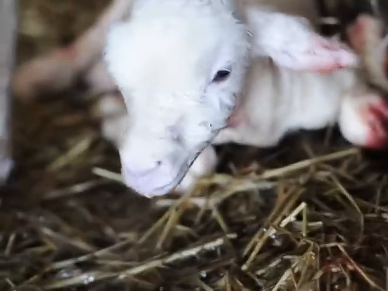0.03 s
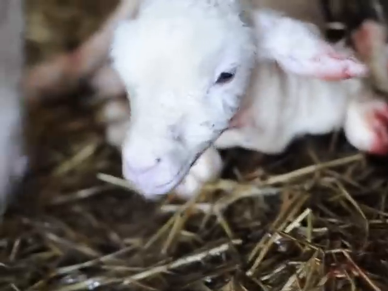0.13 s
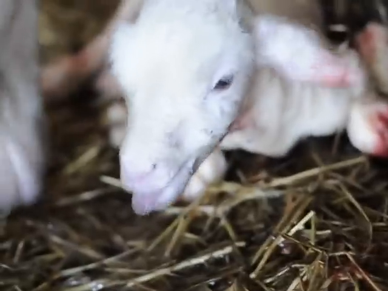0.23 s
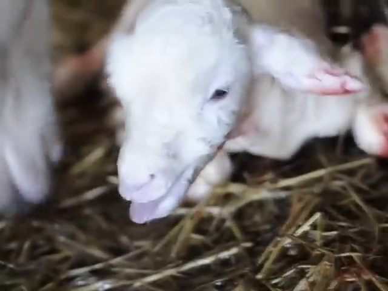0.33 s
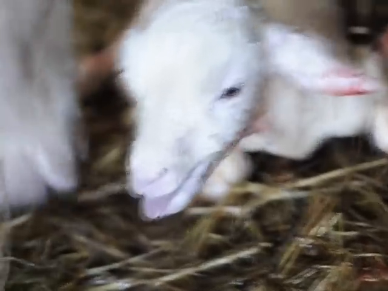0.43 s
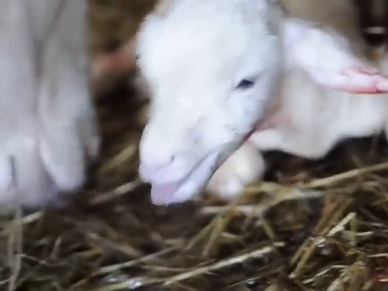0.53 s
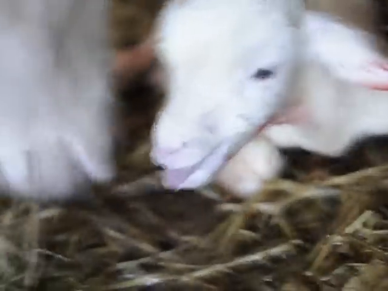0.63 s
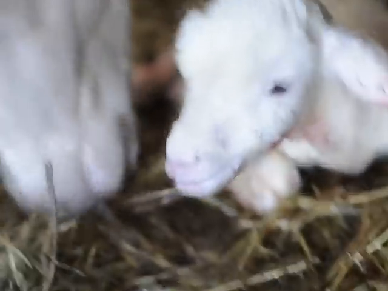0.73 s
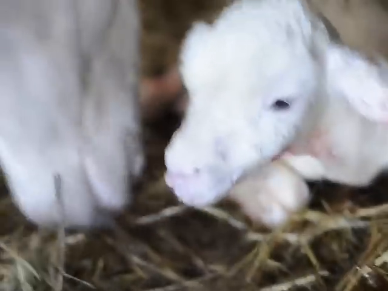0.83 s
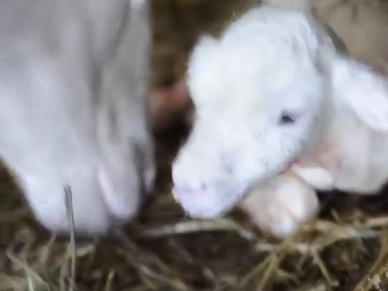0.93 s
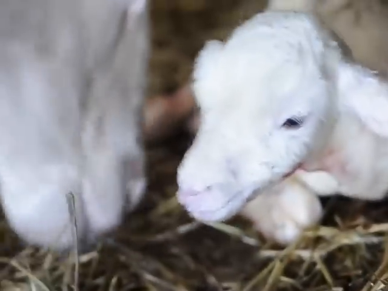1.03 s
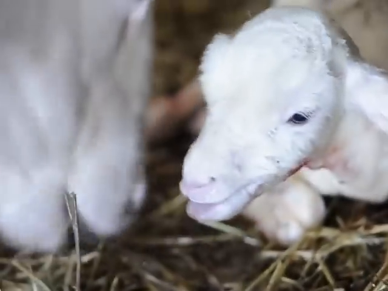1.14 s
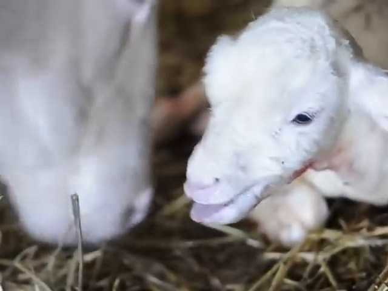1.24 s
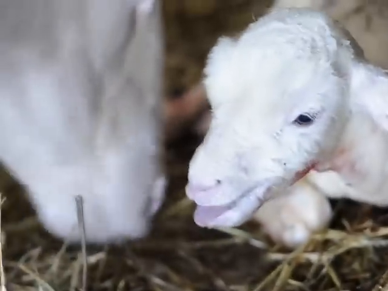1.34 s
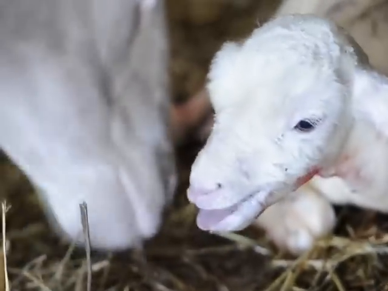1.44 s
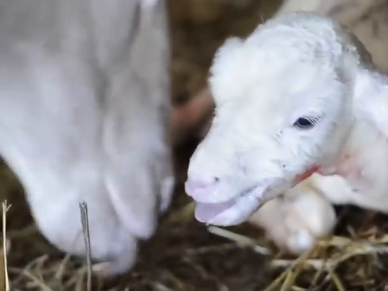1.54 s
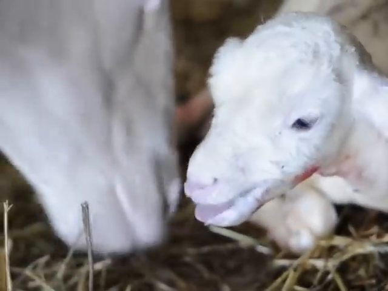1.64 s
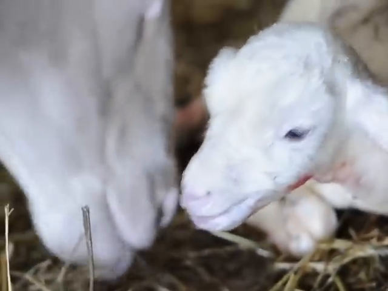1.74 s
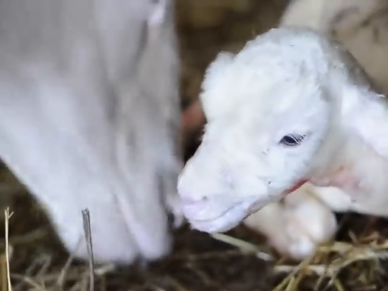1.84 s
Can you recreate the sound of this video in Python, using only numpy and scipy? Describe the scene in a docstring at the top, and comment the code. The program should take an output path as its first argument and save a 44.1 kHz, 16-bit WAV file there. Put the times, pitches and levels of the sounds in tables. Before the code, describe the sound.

A newborn lamb bleats twice, high and nearly steady in pitch, each call opening bright then closing. Small knocks, straw snaps and rustles fall around the calls; close microphone, faint short barn reflections, quiet background.

```python
"""Newborn lamb bleating in a straw barn

A lamb gives two high, clean bleats close by: harmonics of a gliding pitch, and pulsed air noise,
shaped by the moving resonances of a throat that opens wide and closes again.
Straw ticks, rustles and shuffles are short bursts of filtered noise; soft knocks are decaying modes.
Faint reflections from the barn and a steady floor of dull noise surround them."""
import sys
import numpy as np
from scipy import signal
from scipy.fft import rfft, irfft
from scipy.io import wavfile
from scipy.ndimage import map_coordinates

SR = 44100
rng = np.random.default_rng(int(sys.argv[2]) if len(sys.argv) > 2 else 0)


def generate_wav(sig):
    """Save sig (samples, or channels by samples) to the path in sys.argv[1] as 16-bit PCM at SR."""
    pcm = np.round(np.clip(np.atleast_2d(sig).T, -1, 1) * 32767).astype(np.int16)
    wavfile.write(sys.argv[1], SR, pcm)


N = 83790
T = np.arange(N) / SR  # time in seconds

# Surroundings
FLOOR_DB = -60.5  # rms of the floor noise
BARN_DB, NEAR_DB = -25, -16  # energy of the tail and of the early reflections, against the direct sound
NEAR_S = .009  # decay constant of the early reflections
BARN_SIDE_DB = -9  # gain of the side reflections
EDGE_HZ = 13900  # upper limit of the whole sound
TICK_S = 0.0015  # decay constant of a straw tick
STRAW_TOP_HZ = 11500

# Vocal folds
JITTER, JITTER_HZ, SHIMMER = .0015, 120, .03  # relative rms of pitch and level wander, and its rate
CREAK, CREAK_S = .018, 0.023  # extra jitter as the folds start and stop, and its decay constant
FLUTTER_DB, FLUTTER_HZ = 1.1, 14  # each harmonic wavers on its own, the high ones by this rms
SCATTER, SCATTER_HZ = .6, 2  # rms radians by which the upper harmonics drift out of step, and how fast
ATTACK_S, RELEASE_S = .004, 0.0077  # linear rise, exponential decay constant

# Throat
MOUTH_HOLD = .15  # share of each step between shapes during which the mouth rests
SPLIT_HZ = 2800  # border between low harmonics and treble

# Breath
RASP_DB, RASP_TILT_DB = -21, 6  # base gain of the air noise near 4 kHz, its rise per octave
RASP_PULSE = 0.24  # decay constant of a puff in cycles
AIR_HZ, AIR_WIDTH_HZ, AIR_DB = 1524, 140, 13  # the air noise has a resonance of its own
ONSET_RASP_DB, ONSET_RASP_S = 14, .03  # extra air noise around the start
END_RASP_DB, END_RASP_S = 11.5, 0.016  # extra air noise around the end
HOARSE_S = .1  # half-length of the hoarse swell
HISS_DB, HISS_HZ, HISS_WIDTH_HZ = -19.5, 7800, 3700  # hiss at the lips, against the low harmonics
AFTERFLOW_DB, AFTERFLOW_S = -42.5, 0.021  # breath about the end of the voice: peak level, decay constant


def amp(db):
    """Logarithmic level: decibels become a linear gain."""
    return 10 ** (np.asarray(db) / 20)


def unit(x):
    """Normalisation: a signal is scaled to rms 1."""
    return x / np.sqrt(np.mean(x ** 2) + 1e-20)


def read(points, hz):
    """Log-frequency interpolation: a curve is read between its points."""
    f, value = np.transpose(points)
    return np.interp(np.log(hz + 1), np.log(f + 1), value)


def add(mix, s, sound):
    """Superposition: a sound is added from time s on."""
    part = mix[max(round(s * SR), 0):][:len(sound)]
    part += sound[:len(part)]


def hump(f, hz, width):
    """Resonance: gain peaks at hz and halves at the edges of width."""
    return 1 / (1 + (2 * (f - hz) / width) ** 2)


def bell(t, s, length):
    """Gaussian envelope: a smooth swell around time s."""
    return np.exp(-((t - s) / length) ** 2)


def noise(colour):
    """Spectral shaping: white noise takes the spectrum colour(Hz), at rms 1."""
    spectrum = rfft(rng.standard_normal(N))
    return unit(irfft(spectrum * colour(np.fft.rfftfreq(N, 1 / SR)), N))


def wander(hz):
    """Random modulation: noise low-passed near the given rate, at about rms 1."""
    size, seconds = 2048, 2
    f = np.fft.rfftfreq(size, seconds / size)
    slow = irfft(rfft(rng.standard_normal(size)) * np.exp(-(f / hz) ** 2))
    return np.interp(T, np.arange(size) * seconds / size, unit(slow))


def still_air():
    """Stationary noise: the steady, dull floor of the barn."""
    # Spectrum of the floor. Each row: frequency in Hz, relative level in dB.
    floor_curve = [(25,-1.5),(60,-7),(150,-3),(300,-6),(600,-7),(1200,-10.5),(2500,-13.5),(5000,-21),(10000,-23),(11800,-32),(13000,-40)]
    return amp(FLOOR_DB) * noise(lambda f: amp(read(floor_curve, f)))


def barn(x):
    """Reverberation: quick reflections from nearby bodies and boards, then a faint tail."""
    # Decay of the barn. Each row: frequency in Hz, time to fall by 60 dB in seconds.
    decay_curve = [(300,.25),(1500,.2),(5000,.2),(12000,.15)]
    size = 256
    hz, t, z = signal.stft(rng.standard_normal(SR // 2), SR, nperseg=size)
    decay = amp(-60 * t / read(decay_curve, hz)[:, None])
    tail = signal.istft(z * decay, SR, nperseg=size)[1]
    t = T[:len(tail)]
    near = rng.standard_normal(len(t)) * np.exp(-t / NEAR_S) * (t > .002)
    response = amp(BARN_DB) * tail / np.linalg.norm(tail)
    response = response + amp(NEAR_DB) * near / np.linalg.norm(near)
    return signal.fftconvolve(x, response)[:N]


def knocks():
    """Modal vibration: soft hoof knocks ring a few short, dull modes of the floor."""
    # Blows of a hoof. Each row: start in seconds, peak level in dB.
    blows = [(0.004,-32),(0.016,-41.5),(0.026,-41),(0.194,-36.5),(1.159,-39),(1.512,-47)]
    # Modes of the floor. Each row: frequency in Hz, level in dB, time to fall by 60 dB in seconds.
    modes = [(457,0,0.023),(556,-9,0.032),(2000,-8.5,.012),(2940,-9,.01)]
    out, t = np.zeros(N), T[:SR // 8]
    ring = sum(amp(db - 60 * t / t60) * np.sin(2 * np.pi * hz * t) for hz, db, t60 in modes)
    ring = ring * (1 - np.exp(-t / 0.0038))  # a padded contact softens the start
    for s, db in blows:
        add(out, s, amp(db) * ring / abs(ring).max())
    return out


def straw():
    """Filtered noise bursts: stalks snap abruptly, rustle in grains and shift under the animals."""
    # Snapping stalks. Each row: start in seconds, peak level in dB before the low-pass,
    # centre in Hz, width in Hz.
    snaps = [(0.7252,-31.5,4170,7000),(0.7415,-57,3200,1200),(0.768,-55,10000,4000),(0.784,-60,4500,6000),(0.8035,-40,5250,5100),(0.8687,-41,5230,5000),(1.029,-44.5,7000,5000),(1.038,-49,1900,700),(1.745,-44,1932,498),(1.756,-55,10000,2500),(1.8036,-38,7800,2200),(1.810,-38,6800,1980)]
    # Bright rustles, then dull shuffles in the bedding. Each row: centre time in seconds,
    # length in seconds, level at the centre in dB, centre frequency in Hz, width in Hz.
    bright_swells = [(0.014,0.059,-58,3330,5000),(0.79,0.02,-72,6000,8000),(0.898,0.021,-60.5,5760,7000),(1.821,0.03,-60,7000,4960)]
    dull_swells = [(0.179,0.056,-61.5,197,159),(0.84,0.082,-59,161,110),(0.855,0.036,-60,800,900),(0.93,0.11,-66.5,85,70),(1.178,0.078,-51.5,525,420),(1.363,0.1,-59,191,241.5),(1.38,0.02,-45.5,810,700),(1.774,0.044,-60,560,200),(1.871,.06,-64,540,199)]
    out = np.zeros(N)
    for s, db, hz, width in snaps:
        burst = noise(lambda f: hump(f, hz, width))[:SR // 50]
        tick = burst * np.exp(-T[:SR // 50] / TICK_S)
        add(out, s, amp(db) * tick / abs(tick).max())
    for s, length, db, hz, width in bright_swells + dull_swells:
        grains = unit(noise(lambda f: hump(f, hz, width)) * amp(1.6 * wander(300)))
        out += amp(db) * grains * bell(T, s, length / 2)
    low_pass = signal.butter(N=10, Wn=STRAW_TOP_HZ, fs=SR, output="sos")
    return signal.sosfilt(low_pass, out)


def throat(shapes, times, frames, f):
    """Formant filtering: gain (frames, bins) of resonances gliding from mouth shape to shape."""
    place = np.interp(frames, times, np.arange(len(shapes)))
    place = np.floor(place) + np.clip((place % 1 - .5) / (1 - MOUTH_HOLD) + .5, 0, 1)
    weights = np.maximum(1 - abs(place[:, None] - np.arange(len(shapes))), 0)
    hz, width, db = np.einsum("ts,skc->ckt", weights, np.array(shapes, float))[..., None]
    return np.sqrt(((amp(db) * hump(f, hz, width)) ** 2).sum(0))


def bleat(span, times, pitch, effort, shapes, notches):
    """Source-filter principle: harmonics and pulsed air noise pass through the moving throat."""
    # Spectrum of the breath about the end. Each row: frequency in Hz, relative level in dB.
    breath_curve = [(200,-26),(450,-2),(1600,11),(2600,2),(5000,3.5),(8000,-3),(12000,-18)]
    start, end, hoarse_at, hoarse_db = span
    size, hop = 512, 128
    f, frames, _ = signal.stft(np.zeros(N), SR, nperseg=size, noverlap=size - hop)

    # Pitch, least steady at both ends, and its running count of cycles
    edges = np.exp(-np.maximum(np.minimum(T - start, end - T), 0) / CREAK_S)
    hz = np.interp(T, *np.transpose(pitch)) * (1 + (JITTER + CREAK * edges) * wander(JITTER_HZ))
    turns = np.cumsum(hz) / SR

    # Resonances and passing antiresonances
    dips = sum(db * hump(f, at, width) * bell(frames, s, length)[:, None]
               for at, width, db, s, length in notches)
    gain = throat(shapes, times, frames, f) * amp(dips)

    # Low and high harmonics are brought to their own levels, with a smooth crossover
    orders = np.arange(1, 36)
    lines = np.interp(frames, T, hz)[:, None] * orders
    places = [np.arange(len(frames))[:, None] + 0 * lines, lines / f[1]]
    power = map_coordinates(gain, places, order=1, mode="nearest") ** 2 / 2
    when, low_db, high_db = np.transpose(effort)
    low_power = (power * (lines < SPLIT_HZ)).sum(1)
    high_power = (power * (lines >= SPLIT_HZ)).sum(1)
    low = amp(np.interp(frames, when, low_db)) / np.sqrt(low_power)
    high = amp(np.interp(frames, when, high_db)) / np.sqrt(high_power)
    treble = .5 + .5 * np.tanh((f - SPLIT_HZ) / 400)
    gain = gain * low[:, None] ** (1 - treble) * high[:, None] ** treble

    # Minimum phase follows from the log gain by the Hilbert transform
    mirrored = np.hstack([gain, gain[:, -2:0:-1]])
    phase = -signal.hilbert(np.log(mirrored)).imag[:, :len(f)]
    sizes = map_coordinates(gain, places, order=1, mode="nearest").T
    lags = map_coordinates(phase, places, order=1, mode="nearest").T
    voice = np.zeros(N)
    for k, line_gain, lag in zip(orders, sizes, lags):
        level = np.interp(T, frames, line_gain) * amp(FLUTTER_DB * np.tanh(k / 8) * wander(FLUTTER_HZ))
        drift = SCATTER * np.tanh(k / 10) * wander(SCATTER_HZ)
        voice += level * np.cos(2 * np.pi * k * turns + np.interp(T, frames, lag) + drift)
    voice = voice * (1 + SHIMMER * wander(JITTER_HZ))

    # Air noise puffs once a cycle and passes through the same throat
    flow = unit(0.46 + np.exp(-(turns % 1) / RASP_PULSE))
    puffs = flow * rng.standard_normal(N)
    air = signal.stft(puffs, SR, nperseg=size, noverlap=size - hop)[2]
    air_db = RASP_TILT_DB * np.log2((f + 200) / 4000) + AIR_DB * hump(f, AIR_HZ, AIR_WIDTH_HZ)
    air = air * (gain * np.exp(1j * phase) * amp(air_db)).T
    air = signal.istft(air, nperseg=size, noverlap=size - hop)[1][:N]
    air = air * np.sqrt(SR / hz) / 2  # noise density to match the spacing of the harmonics
    onset_db = ONSET_RASP_DB * bell(T, start, ONSET_RASP_S)
    end_db = END_RASP_DB * bell(T, end, END_RASP_S)
    rasp = amp(RASP_DB + onset_db + end_db) * air

    hiss = flow * noise(lambda f: hump(f, HISS_HZ, HISS_WIDTH_HZ))
    hiss = hiss * amp(HISS_DB + np.interp(T, when, low_db))
    hoarse = amp(hoarse_db * bell(T, hoarse_at, HOARSE_S))
    gate = np.clip((T - start) / ATTACK_S, 0, 1) * np.exp(-np.maximum(T - end, 0) / RELEASE_S)

    # Breath swells toward the end and still rushes out once the folds have stopped
    breath = noise(lambda f: amp(read(breath_curve, f)))
    afterflow = amp(AFTERFLOW_DB) * np.exp(-abs(T - end) / AFTERFLOW_S) * breath
    return afterflow + gate * (voice + hoarse * (rasp + hiss))


def scene():
    """Mid-side stereo: lamb, straw and knocks in the middle, reflections also at the sides."""
    # Bleats. Each row: start in seconds, end in seconds, hoarsest time in seconds,
    # extra air noise then in dB.
    spans = [(0.131,0.692,0.51,3),(1.053,1.675,1.49,3)]
    # Mouth movement, one row per bleat: times in seconds at which its four shapes are reached.
    mouth_times = [(0.165,0.22,0.39,0.63),(1.06,1.12,1.34,1.56)]
    # Pitch, one table per bleat. Each row: time in seconds, pitch in Hz before jitter.
    pitches = [
        [(0.133, 370.4), (0.151, 395.5), (0.161, 366), (0.171, 392.7), (0.209, 411.1), (0.265, 417),
         (0.463, 428.8), (0.599, 426), (0.647, 417.3), (0.687, 406), (0.7, 401.7)],
        [(1.055, 455.8), (1.071, 389.6), (1.117, 421.8), (1.183, 420.6), (1.339, 431.8), (1.389, 434.2),
         (1.461, 431.3), (1.625, 416.5), (1.667, 402.8), (1.68, 411)],
    ]
    # Effort, one table per bleat. Each row: time in seconds, level of the low harmonics in dB,
    # level of the treble in dB.
    efforts = [
        [(0.137, -44.5, -57.5), (0.185, -41.5, -48), (0.215, -33.5, -34.5), (0.275, -29.5, -22.5),
         (0.351, -28, -15.5), (0.383, -26, -16), (0.465, -28, -17), (0.647, -29, -28.5), (0.683, -28, -34.5),
         (0.694, -31, -36.5)],
        [(1.058, -42.5, -47.5), (1.09, -37.5, -33), (1.16, -32.5, -21.5), (1.248, -27.5, -17),
         (1.374, -28.5, -15.5), (1.64, -29, -29), (1.668, -28.5, -35), (1.674, -34, -38.5)],
    ]
    # Antiresonances that come and go as the head and mouth move, one table per bleat.
    # Each row: frequency in Hz, width in Hz, gain in dB, deepest time in seconds, half-length in seconds.
    antiresonances = [
        [(3090,1500,-7,0.18,0.054),(1945,240,-10,0.73,0.5),(3300,350,-5.5,0.26,.025),(4210,260,-19.5,0.69,0.15),(6970,364,-21.5,0.35,0.35),(8300,350,-5,0.42,.12),(12480,850,-11,0.42,0.33)],
        [(2900,900,-18,1.06,0.039),(1244,250,-28,1.14,0.017),(1300,83,-10,1.372,0.11),(2160,230,-4.5,1.2,0.025),(2170,100,-8,1.6,0.019),(2650,250,-4,1.4,0.065),(4400,160,-14,2,0.013),(4690,160,-13.5,1.55,0.087),(6350,910,-11.5,1.1,0.68),(9000,1080,-24,1.37,0.26)],
    ]
    # Throat resonances of each mouth shape.
    # Each row: frequency in Hz, width in Hz, relative level in dB.
    nasal = [(400,110,-4),(1111,1600,-13.5),(1650,590,-15.5),(3080,1400,-7.5),(4250,600,4.5),(4700,230,-9),(5800,700,4),(7800,2300,-7),(9100,900,-25.5),(10900,1200,-47),(13000,1200,-25)]
    parted = [(840,1500,-6),(1200,700,-12),(1690,350,0.5),(2350,840,-9),(3670,870,-5.5),(4400,600,-9),(4960,1800,-4),(7500,490,-3),(8700,430,-25),(10500,1200,-32),(13000,1200,-37.5)]
    ajar = [(875,160,-6),(1206,810,-6.5),(1590,400,-13.5),(2860,310,1.5),(3700,600,-1.5),(4380,550,-0.5),(5420,830,-0.5),(7890,1400,-13),(9050,270,-10),(10850,1300,-18),(13000,1200,-51.5)]
    gape = [(860,180,-6.5),(1280,450,-9),(1720,1200,-8),(2890,890,-10.5),(3620,650,-4.5),(4814,600,3.5),(5880,580,5),(7200,380,-20),(8840,430,-18),(10200,4000,-24),(13300,900,-31.5)]
    wide = [(850,440,-10),(1260,400,-10),(1820,320,-2),(3070,1700,-12),(3700,620,2),(4920,890,0.5),(5850,800,-1),(7664,280,-4.5),(8620,160,-4),(10520,1400,-25.5),(12500,1100,-34)]
    closing = [(918,350,-3.5),(1240,420,-5.5),(1616,270,1),(2546,1800,-9.5),(3590,1200,0.5),(4804,1100,1.5),(5920,830,-5),(7780,560,-5),(8640,370,-6),(9685,1600,-16),(12800,1200,-27)]
    mouths = [[nasal, ajar, gape, closing], [parted, ajar, wide, closing]]

    calls = zip(spans, mouth_times, pitches, efforts, mouths, antiresonances)
    near = sum(bleat(*parts) for parts in calls) + straw() + knocks()
    mid = near + barn(near) + still_air()
    brightened = np.diff(near, prepend=0) / 2
    side = amp(BARN_SIDE_DB) * barn(brightened)
    return np.array([mid + side, mid - side])


def record(dry):
    """Band limitation: a linear-phase low-pass removes the highest treble."""
    low_pass = signal.firwin(511, EDGE_HZ, window=("kaiser", 9), fs=SR)
    return signal.oaconvolve(dry, low_pass[None], "same")


dry = scene()
out = record(dry)
generate_wav(out)
```